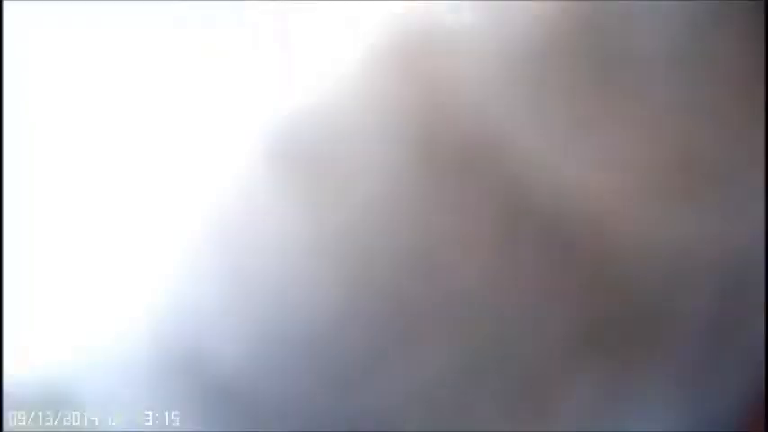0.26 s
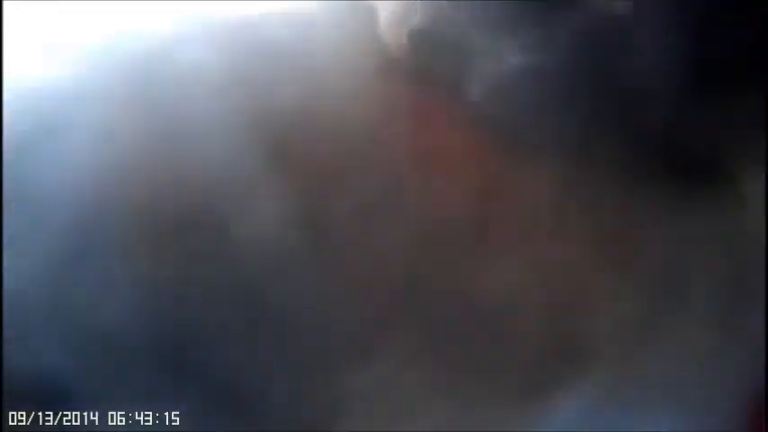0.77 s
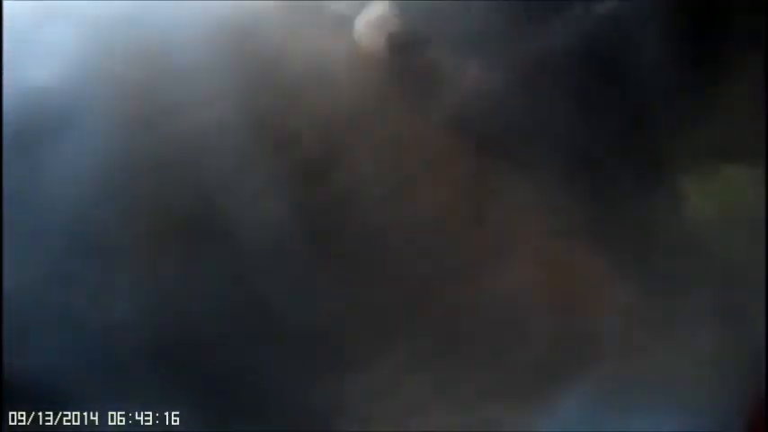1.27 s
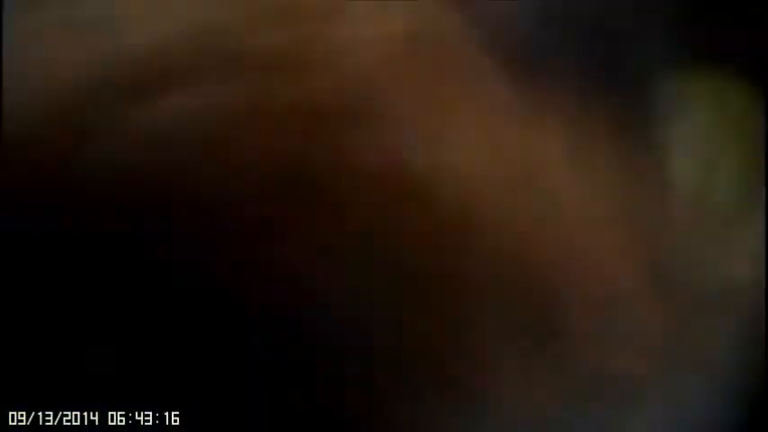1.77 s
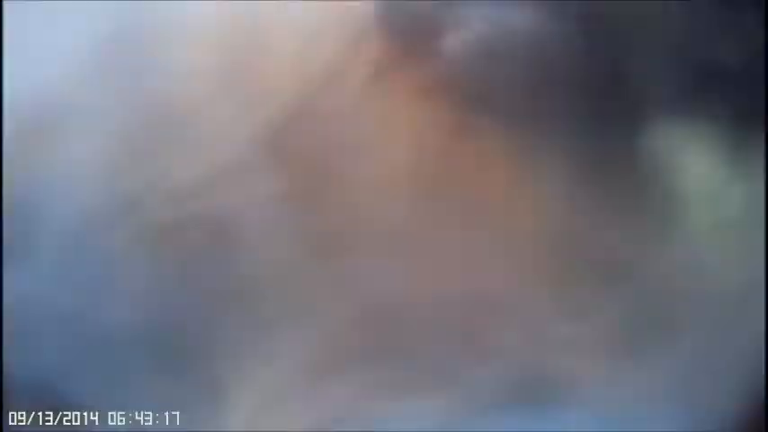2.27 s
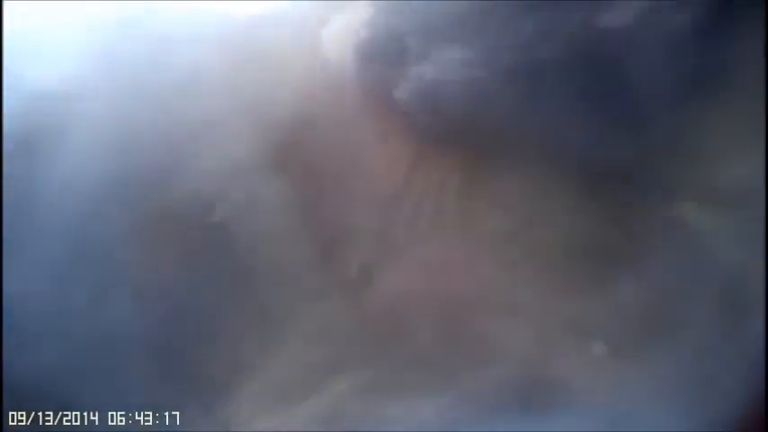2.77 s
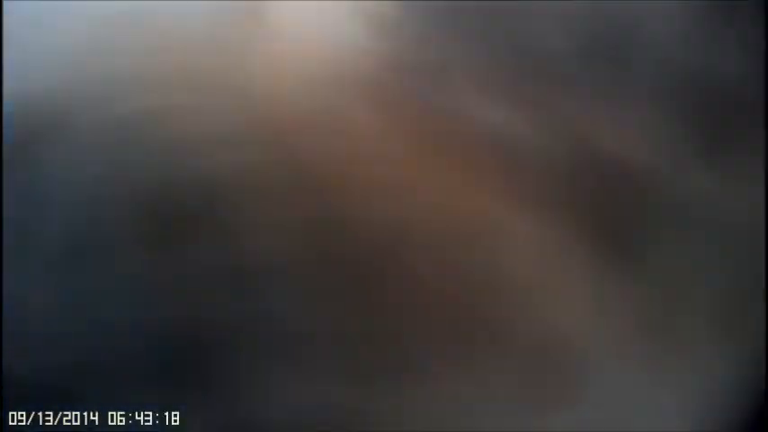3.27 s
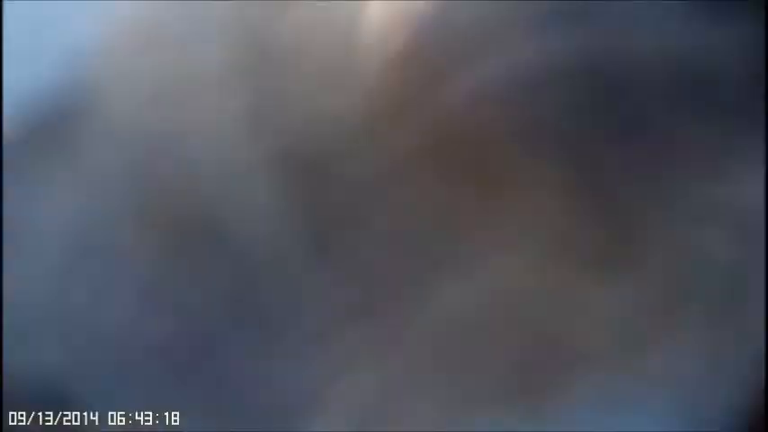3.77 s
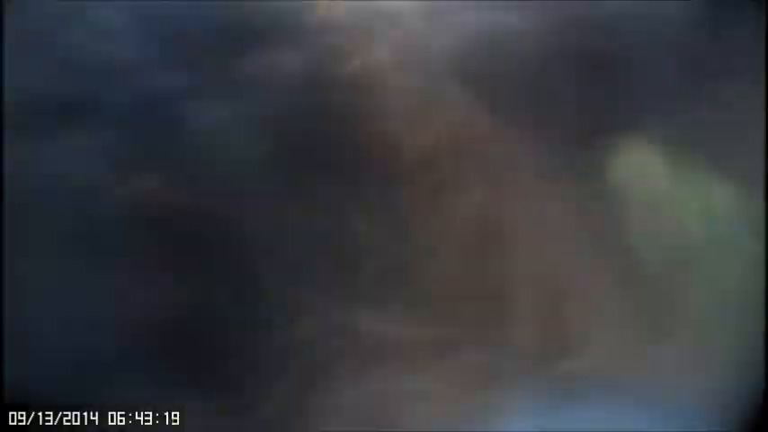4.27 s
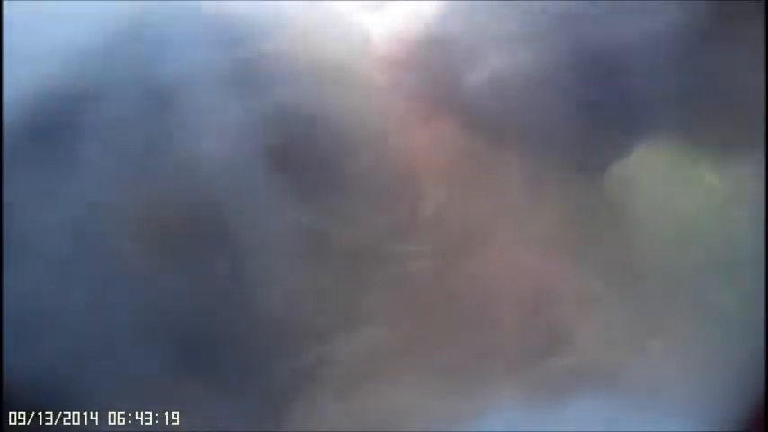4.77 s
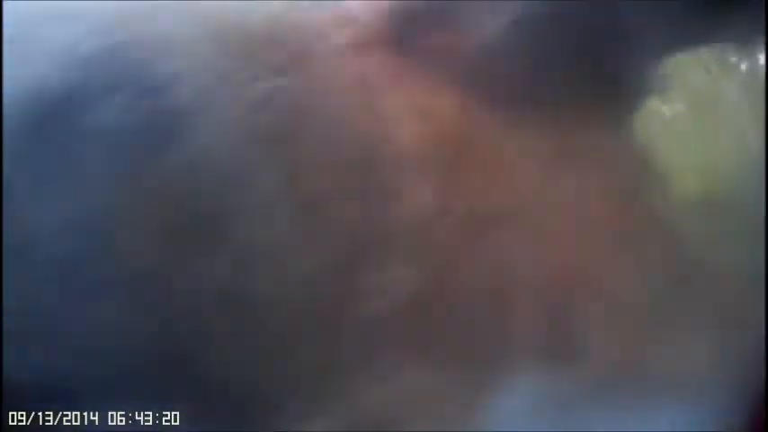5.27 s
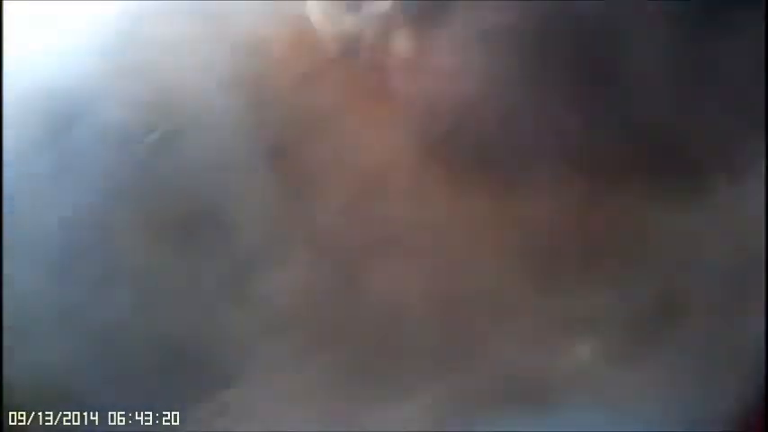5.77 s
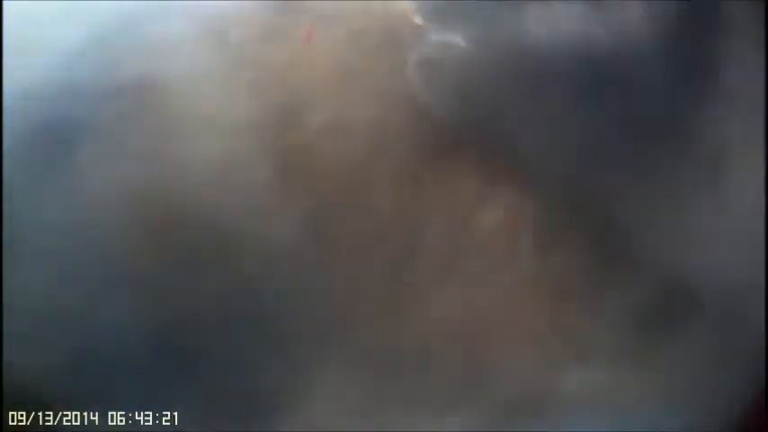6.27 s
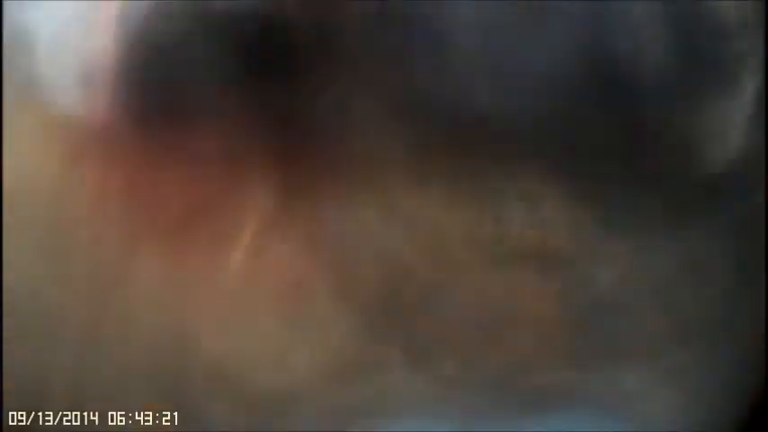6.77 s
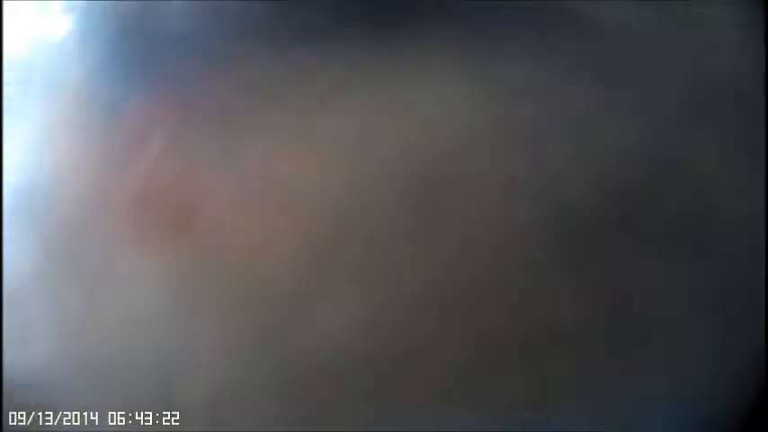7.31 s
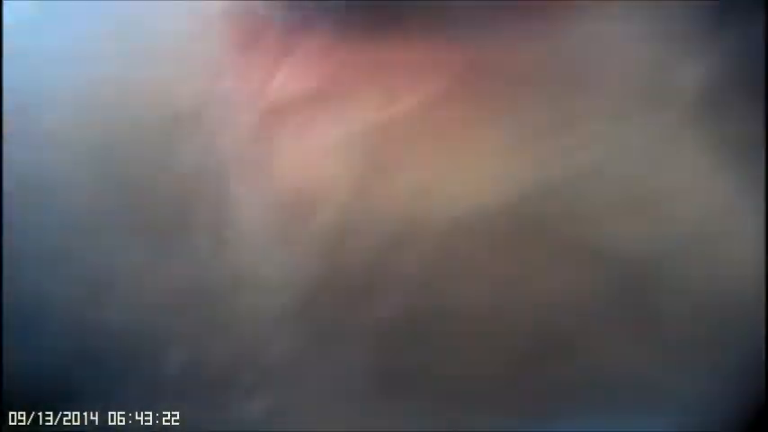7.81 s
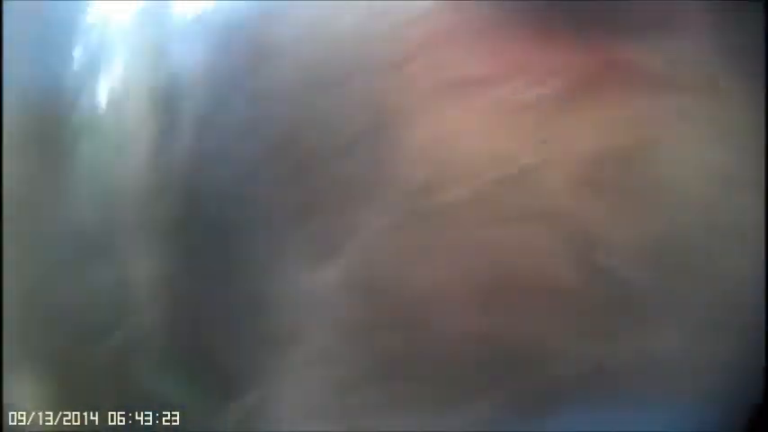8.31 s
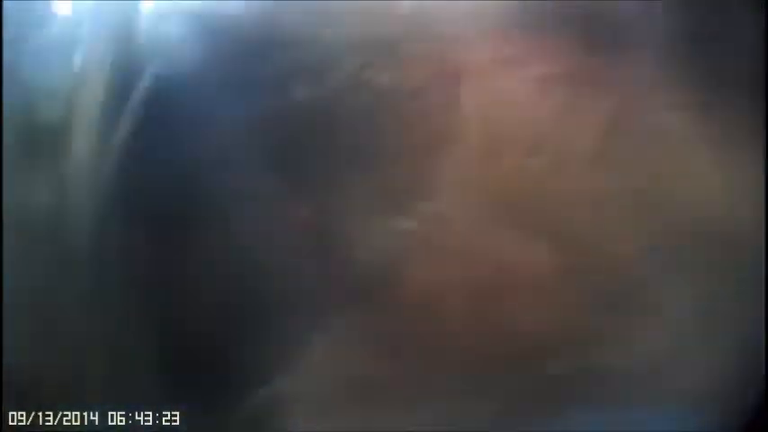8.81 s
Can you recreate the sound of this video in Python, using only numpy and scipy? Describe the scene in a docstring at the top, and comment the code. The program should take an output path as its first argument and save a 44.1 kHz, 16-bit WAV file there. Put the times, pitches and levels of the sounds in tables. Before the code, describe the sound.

Loud, shrill hog screams outdoors, very close and distorted, with low bumps and gritty rubbing against the microphone.

```python
"""Outdoors, right beside a caught hog; the microphone sits in a small camera's closed housing.
The first of five long, hoarse cries opens at once, overblown folds ringing in throat, mouth and snout.
Through the first three the struggling body thumps, scrapes and shoves the housing, and brief whistles
and groans join in. A low grunt runs under the fourth; one more thump and scraping lead into the fifth.
The loudest blows and cries overload the input."""
import sys
import numpy as np
from scipy import signal
from scipy.fft import rfft, irfft, next_fast_len
from scipy.io import wavfile

SR = 44100
rng = np.random.default_rng(int(sys.argv[2]) if len(sys.argv) > 2 else 0)


def bounce(signal):
    """Save signal as a 16-bit WAV file at the path given by the first command-line argument."""
    frames = np.transpose(np.atleast_2d(signal))
    limited = np.clip(frames, -1, 1)
    pcm = np.round(limited * 32767).astype(np.int16)
    wavfile.write(sys.argv[1], SR, pcm)


N = 399105

# The five cries, a list each. Each row: time in seconds, effort in dB, weights of the mouth and of
# the treble in dB, balance point between the mouth's two cavities in Hz.
CRY_CURVES = [
    [(0.0, -28.5, -4.5, -0.5, 3000), (0.204, -19.5, -6, -8.5, 3320), (0.35, -13.5, -5.5, -11, 2780),
     (0.426, -17, -8, -10, 3800), (0.516, -13.5, -10, -11, 2920), (0.708, -12.5, -2.5, -7, 3540),
     (0.858, -10.5, -6.5, -11.5, 3330), (0.96, -37.5, -3.5, -8, 2800)],
    [(1.24, -44, -2, -23, 3100), (1.346, -17.5, 1.5, -3, 3530), (1.606, -10, -9.5, -4, 3130),
     (1.732, -8.5, -5, -9.5, 3700), (1.792, -8.5, -4, -6.5, 2900), (1.866, -18, -4.5, -8, 3400),
     (1.938, -27.5, -9.5, -4, 3280), (2.22, -15.5, -1.5, -7.5, 3420), (2.28, -6, -10, -10.5, 3340),
     (2.384, -13.5, -9, -9, 3400), (2.516, -11, -0.5, -8, 3310), (2.676, -11.5, -2.5, -9.5, 3150),
     (2.79, -46, -3, -3.5, 2840)],
    [(3.09, -44, -4, -10, 3000), (3.148, -15, 4, -0.5, 2990), (3.358, -15.5, -7.5, -5, 3300),
     (3.6, -24, -6.5, -7, 3110), (3.77, -9, -6, -9, 3020), (3.942, -8.5, -14.5, -14, 3580),
     (4.132, -13.5, -8.5, -14.5, 3130), (4.346, -12.5, -8.5, -9, 3590), (4.532, -10, -11, -14.5, 3360),
     (4.79, -17, -6.5, -8, 2980), (4.84, -51, -2, -6, 2880)],
    [(5.08, -45, -3.5, -5, 2920), (5.23, -12, -1.5, -10, 3090), (5.42, -9.5, -7, -5.5, 3170),
     (5.6, -14.5, -4, -2.5, 2860), (5.66, -6, -10, -9.5, 3540), (5.82, -12.5, -5, -9, 3100),
     (6.02, -8.5, -10, -8.5, 3200), (6.21, -9.5, -1, -13.5, 3200), (6.27, -10, -6.5, -22, 3210),
     (6.78, -14, 0.5, -11.5, 2966), (7.03, -9.5, -4, -10.5, 3090), (7.1, -27.5, -9, -14, 2920)],
    [(7.43, -26.5, -4, -7, 2940), (7.502, -11, 5, -15.5, 2900), (7.628, -13, -4.5, -11.5, 3030),
     (7.708, -6.5, -1, -18, 2950), (7.744, -15, -5, -10, 3060), (8.048, -8, -2, -12, 3015),
     (8.102, -15, -8, -14, 3350), (8.286, -11.5, -2, -12, 2930), (8.552, -9.5, -8.5, -14.5, 3450),
     (8.874, -16, -4, -11.5, 3420), (8.958, -8, -4.5, -12, 3160), (9.05, -14.5, -17, -17.5, 3180)],
]


def gain_of(db):
    """Decibels to a factor."""
    return 10 ** (np.asarray(db) / 20)


def unit_rms(x):
    """Scales to rms 1."""
    return x / np.sqrt(np.mean(x ** 2) + 1e-20)


def add(mix, start_s, sound):
    """Mixes a sound in from start_s on."""
    part = mix[round(start_s * SR):][:len(sound)]
    part += sound[:len(part)]


def curves(rows):
    """Turns rows led by a time in seconds into one full-length curve for each further column."""
    times, *columns = np.transpose(rows)
    return [np.interp(np.arange(N) / SR, times, column) for column in columns]


def drift(top_hz):
    """Random wander below top_hz, rms 1."""
    lowpass = signal.butter(2, top_hz, fs=SR)
    return unit_rms(signal.lfilter(*lowpass, rng.standard_normal(N + SR))[SR:])


def coloured(points):
    """Noise of rms 1, its spectrum drawn through points of frequency in Hz and relative dB."""
    hz, db = np.transpose(points)
    size = next_fast_len(N)
    shape = gain_of(np.interp(np.log(np.fft.rfftfreq(size, 1 / SR) + 1), np.log(hz), db))
    return unit_rms(irfft(rfft(rng.standard_normal(size)) * shape, size)[:N])


def resonate(x, hz, width_hz):
    """A steep, moving resonance of rms 1: shifts hz down to zero, smooths three times, shifts back."""
    carrier = np.exp(2j * np.pi * np.cumsum(hz * np.ones(len(x))) / SR)
    pole = np.exp(-np.pi * width_hz / SR)
    smoothed = signal.lfilter([1], np.poly([pole] * 3), x / carrier)
    return unit_rms((carrier * smoothed).real)


def glide(length_s, first_hz, last_hz, db, bend=1.8, fade_share=0.17):
    """Pitch curve and envelope of one glide: a rise comes early, a fall comes late."""
    progress = np.arange(0, length_s, 1 / SR) / length_s
    travel = progress ** bend if last_hz < first_hz else 1 - (1 - progress) ** bend
    envelope = gain_of(db) * np.clip(np.minimum(progress, 1 - progress) / fade_share, 0, 1)
    return first_hz + (last_hz - first_hz) * travel, envelope


def tone(hz, envelope, waver):
    """A sine on a pitch curve, wavering by the given share of its pitch."""
    cycles = np.cumsum(hz * (1 + waver * drift(73)[:len(hz)])) / SR
    return np.sqrt(2) * envelope * np.sin(2 * np.pi * cycles)


def folds(pulse_hz=715, jitter=0.1, breathiness=1.9, flutter_db=0.5):
    """Overblown folds slap at uneven times and let puffs of breath through; the air flow flutters."""
    cycles = np.cumsum(pulse_hz * np.exp(jitter * drift(80) + 0.04 * drift(4))) / SR
    slaps = np.diff(np.floor(cycles), prepend=0) * gain_of(5.6 * rng.standard_normal(N))
    puffs = (5.2 + np.exp(-(cycles % 1) / 0.5)) * rng.standard_normal(N)
    return (unit_rms(slaps) + breathiness * unit_rms(puffs)) * gain_of(flutter_db * drift(170))


def breath(attack_s=0.0078, release_s=0.0087):
    """The breath starts and stops quickly with each cry and rests between them."""
    t = np.arange(N) / SR
    ramps = (np.minimum((t - cry[0][0]) / attack_s, (cry[-1][0] - t) / release_s + 1)
             for cry in CRY_CURVES)
    return sum(np.clip(ramp, 0, 1) for ramp in ramps)


def mouth_tuning(shut_drop=0.081, open_s=0.06, close_s=0.042):
    """Pitch factor of throat and snout: the shut mouth lowers them on both sides of each pause."""
    t = np.arange(N) / SR
    opening = sum(np.exp(-abs(t - cry[0][0]) / open_s) for cry in CRY_CURVES[1:])
    closing = sum(np.exp(-abs(t - cry[-1][0]) / close_s) for cry in CRY_CURVES[:-1])
    return 1 - shut_drop * (opening + closing)


def cries(main_hz=2103.6, lower_hz=2976, upper_hz=3650, least_share=0.084, steady=0.7):
    """The folds ring in throat, mouth and snout; the main resonance takes what mouth and treble leave."""
    # Resonances of the throat, a shrill pair and the snout.
    # Each row: centre in Hz, width in Hz, relative level in dB.
    throat_modes = [(1573, 146, 2), (680, 390, -10), (507, 2700, -16.5)]
    shrill_modes = [(4382, 380, -5), (5015, 390, 0)]
    snout_modes = [(5430, 4100, -0.5), (6990, 830, -2), (7494, 460, -4.5), (8730, 1200, -9),
                   (9920, 730, -14), (11350, 3000, -14.5)]
    # The cavity behind the tongue. Each row: time in seconds, centre in Hz, weight in dB,
    # level of the shrill pair against the snout in dB.
    tongue_path = [(0, 1470, -13, -0.5), (.55, 1410, -18.5, 4.5), (.9, 1310, -13.5, 1),
                   (1.32, 1110, -10, -5), (1.42, 1610, -17.5, -3), (1.75, 1365, -16.5, -6.5),
                   (2.4, 1450, -14.5, 2.5), (2.72, 1230, -16, -4.5), (3.16, 1120, -13.5, -3),
                   (3.3, 1630, -13, -3.5), (3.9, 1710, -21.5, 0.5), (4.45, 1660, -20, 7.5),
                   (4.78, 1380, -13.5, 5), (5.3, 1235, -19.5, -1), (6.2, 1356, -15, 2),
                   (6.5, 1226, -19.5, -0.5), (8, 1217, -14.5, -1), (8.3, 1280, -15, 1.5)]
    effort_db, mouth_db, treble_db, balance_hz = curves(sum(CRY_CURVES, []))
    tongue_hz, tongue_db, shrill_db = curves(tongue_path)
    main_share = np.sqrt(np.clip(1 - gain_of(2 * mouth_db) - gain_of(2 * treble_db), least_share, 1))
    upper_share = np.clip((balance_hz - lower_hz) / (upper_hz - lower_hz), least_share ** 2, 1 - least_share)
    drive, tuning = folds(), mouth_tuning()

    def cavity(hz, width_hz, looseness=1):
        """One cavity, wandering in pitch and strength, the more so the higher it lies."""
        height = hz / 2000
        ringing = resonate(drive, hz + looseness * 42.6 * height * drift(6), width_hz)
        return ringing * gain_of(1.88 * np.sqrt(height) * drift(9))

    def bank(modes):
        """Cavities of alternating sign, retuned as the mouth opens and shuts."""
        return unit_rms(sum((-1) ** k * gain_of(db) * cavity(hz * tuning, width_hz)
                            for k, (hz, width_hz, db) in enumerate(modes)))

    throat, shrill, snout = bank(throat_modes), bank(shrill_modes), bank(snout_modes)
    voice = main_share * cavity(main_hz, 387, steady)
    voice -= gain_of(-6 + 0.63 * tongue_db) * throat  # partly follows the tongue's level
    voice -= gain_of(tongue_db) * cavity(tongue_hz, 440, steady)
    voice -= gain_of(treble_db - 3.5) * (snout + gain_of(shrill_db) * shrill)
    upper = np.sqrt(upper_share) * cavity(upper_hz, 560)
    lower = np.sqrt(1 - upper_share) * cavity(lower_hz, 600, steady)
    voice += gain_of(mouth_db) * (upper - lower)
    voice *= gain_of(effort_db) * breath()
    notched = signal.lfilter(*signal.iirnotch(960, 2.5, fs=SR), voice)  # a side cavity swallows this band
    return 0.42 * voice + 0.54 * notched


def rumble():
    """Lumpy low pressure swings as the housing is shoved about."""
    # Each row: time in seconds, level in dB.
    shoving = [(0, -18), (.22, -23.5), (.5, -49), (1.5, -38.5), (1.69, -26), (2.19, -25), (2.35, -66),
               (2.95, -44), (3.15, -25), (3.75, -26), (4.3, -45), (5.55, -35), (6.25, -44), (7.4, -38),
               (9.05, -47)]
    lows = coloured([(8, -1), (20, 1), (50, -11), (120, -22), (300, -34.5), (1000, -50)])
    lumps = lows * gain_of(0.96 * drift(16))
    return gain_of(curves(shoving)[0]) * unit_rms(lumps)


def open_air(level_db=-47):
    """Faint, steady outdoor air, heard through the housing."""
    # Each row: frequency in Hz, relative noise density in dB.
    air_spectrum = [(100, -8), (365, -9), (1680, -14.5), (2040, -6.5), (2990, 2.5), (3320, -13.5),
                    (6150, -16.5), (16000, -33)]
    return gain_of(level_db) * coloured(air_spectrum)


def blows(knock_s=0.0065, attack_s=0.00036):
    """Each blow swings the microphone's diaphragm, slowing and dying; quick ones also knock the shell."""
    # Each row: start in seconds, strength in dB, size of the swing (+ a push, - a pull),
    # nominal swing rate in Hz, decay time in periods of that rate.
    hits = [(.004, 4.5, 0.9, 24, 0.64), (.13, -17, 1.5, 66.6, 5.1), (.212, 14, 0.74, 64.2, 0.76),
            (.236, 3, -0.6, 24.6, 0.44), (.288, 3, 1, 43.6, 0.27), (.301, 8.5, 0.19, 29.5, 1.8),
            (.953, -28, -1.8, 106, 1.3), (1.583, -7, -0.65, 100, 2.1), (1.856, 12.5, -1.34, 94.7, 0.42),
            (1.883, 14, 0.4, 75, 1.2), (1.941, 2.5, -1, 23.1, 0.76), (2.052, 4, 1.1, 78, 0.35),
            (2.263, -22, 0.4, 119, 9.2), (3.055, -28, -4.5, 52.4, 1.1), (3.347, 10.5, -0.5, 156, 1.1),
            (3.362, 18, 0.5, 63.5, 0.59), (3.432, -8.5, 3, 40, 0.39), (3.449, 14.5, -0.13, 21, 0.71),
            (3.461, -10, 3, 144, 1.7), (3.547, 1.5, 0.14, 88.5, 0.56), (3.75, -1, 1, 141, 0.56),
            (4.605, -38, 4.2, 69.4, 3.3), (7.224, 3.5, 1, 41.4, 1.02)]
    out, t = np.zeros(N), np.arange(SR // 4) / SR
    shell = coloured([(80, 23.5), (250, 13.5), (700, 2), (1300, 3.5), (3000, -30)])
    for k, (start_s, db, size, hz, periods) in enumerate(hits):
        cycles = np.log1p(0.448 * hz * t) / 0.383
        swing = size * np.sin(2 * np.pi * cycles) * np.exp(-hz * t / periods)
        knock = gain_of(-8) * (hz / 100) ** 1.5 * np.exp(-t / knock_s) * shell[k * len(t):][:len(t)]
        add(out, start_s, gain_of(db) * (swing + knock) * (1 - np.exp(-t / attack_s)))
    return out


def scrapes():
    """Bristles and ground drag over the housing: gritty noise swells with each stroke and stops short."""
    # Each row: time of the peak in seconds, level in dB, rise and fall in milliseconds for 7 dB.
    strokes = [(0.059, -17, 0, 9), (0.21, -1.5, 1, 4), (1.06, -39, 86, 25), (1.858, 1, 1, 2),
               (1.889, -14, 9, 3.5), (2.046, -19.5, 19, 11), (3.035, -30.5, 29, 4), (3.07, -19, 6.5, 13),
               (3.348, -3, 9, 5.5), (3.55, -20.5, 3, 18), (3.755, -13, 26, 2), (6.22, -26, 22, 3),
               (7.2, -33.5, 29, 17), (7.273, -18, 37, 7.5), (7.326, -18, 17, 4.5), (7.375, -24, 18, 13)]
    # Each row: frequency in Hz, relative noise density in dB.
    grit_spectrum = [(150, -32), (400, -13), (1400, -18), (2100, -1.5), (3760, -8), (5080, -3.5),
                     (11300, -17), (14500, -26), (16500, -49)]
    t, envelope = np.arange(N) / SR, np.zeros(N)
    for peak_s, db, rise_ms, fall_ms in strokes:
        near = slice(max(round((peak_s - 0.4) * SR), 0), round((peak_s + 0.3) * SR))
        ms = (t[near] - peak_s) * 1000
        below_peak_db = 7 * np.where(ms < 0, -ms / rise_ms, (ms / fall_ms) ** 2)
        envelope[near] += gain_of(db - below_peak_db)
    return envelope * coloured(grit_spectrum) * gain_of(2.85 * drift(310))


def whistles():
    """Clear tones in the throat, rising as a cry opens and falling later in a cry."""
    # Each row: start and length in seconds, first and last pitch in Hz, level in dB.
    notes = [(0.781, 0.13, 1657, 1230, -19), (1.336, 0.32, 1246, 1614, -36), (1.345, 0.1, 402, 454, -41),
             (2.588, 0.099, 1670, 1260, -20.5), (5.36, 0.25, 1520, 1480, -21.5)]
    out = np.zeros(N)
    for start_s, *note in notes:
        add(out, start_s, tone(*glide(*note), waver=0.022))
    return out


def groans(width_hz=270):
    """Hoarse low groans and high squeals: noise through a falling resonance."""
    # Each row: start and length in seconds, first and last pitch in Hz, level in dB.
    notes = [(1.5, 0.17, 3540, 2850, -13), (2.605, 0.15, 880, 533, -39), (4.654, 0.183, 744, 520, -40),
             (6.054, 0.2, 720, 674, -33), (7.95, 0.15, 3260, 3220, -24)]
    out = np.zeros(N)
    for start_s, *note in notes:
        hz, envelope = glide(*note)
        add(out, start_s, envelope * resonate(rng.standard_normal(len(hz)), hz, width_hz))
    return out


def grunt():
    """A low, falling tone under the fourth cry, rough from its wide waver."""
    # One row: start and length in seconds, first and last pitch in Hz, level in dB.
    notes = [(6.37, .33, 136, 95, -39)]
    start_s, *note = notes[0]
    out = np.zeros(N)
    add(out, start_s, tone(*glide(*note), waver=0.24))
    return out


def scene(recovery_s=0.14):
    """All sources at the one close microphone; after a heavy blow the voice dips and comes back."""
    thumps, air = blows(), open_air()
    hog = cries() + whistles() + grunt() + groans()
    pole = np.exp(-1 / (recovery_s * SR))
    dip = signal.lfilter([1 - pole], [1, -pole], np.minimum(abs(thumps), 1))
    return (hog * gain_of(-14 * dip) + thumps + scrapes() + rumble() + air)[None]


def record(dry, ceiling=0.97, edge_hz=16200):
    """The input overloads hard just under full scale; a steep low-pass then limits the band."""
    overloaded = np.clip(dry, -ceiling, ceiling)
    lowpass = signal.firwin(1023, edge_hz, window=("kaiser", 12), fs=SR)
    return signal.oaconvolve(overloaded, lowpass[None], "same")


dry = scene()
out = record(dry)
bounce(out)
```